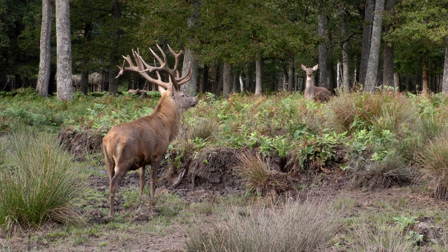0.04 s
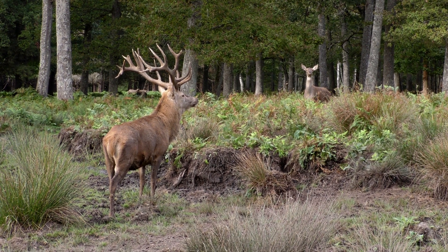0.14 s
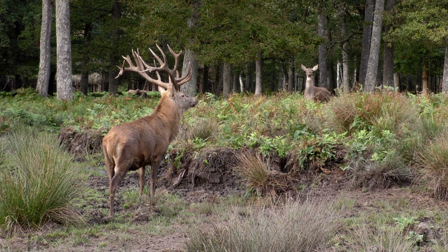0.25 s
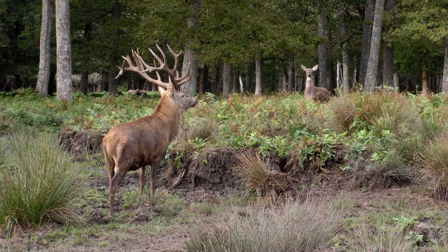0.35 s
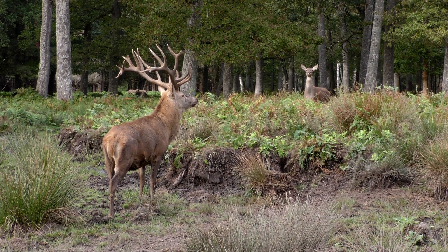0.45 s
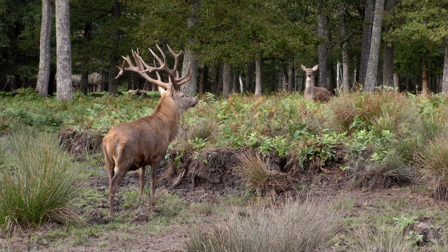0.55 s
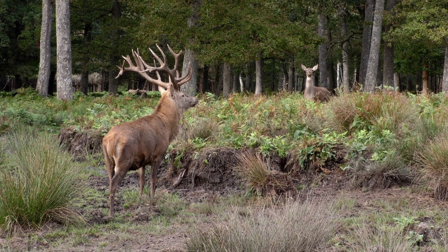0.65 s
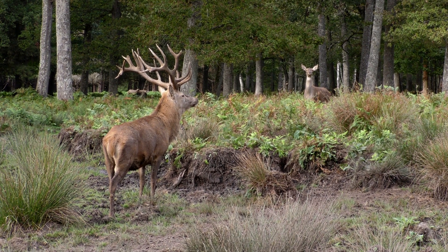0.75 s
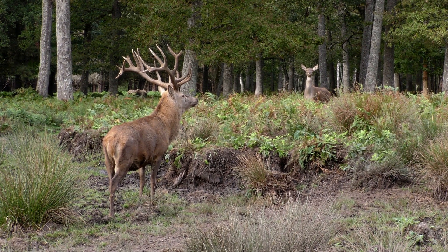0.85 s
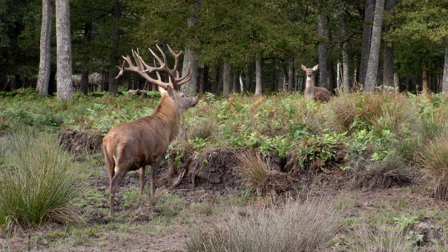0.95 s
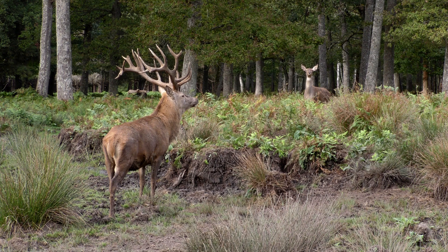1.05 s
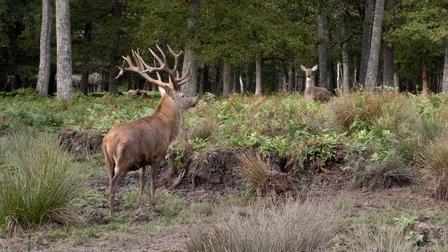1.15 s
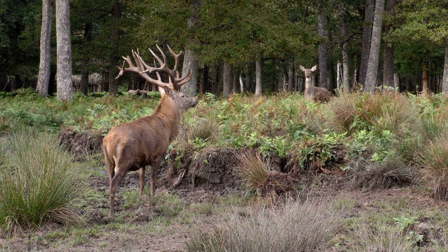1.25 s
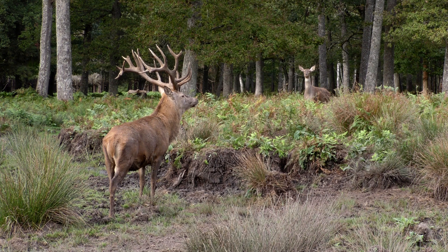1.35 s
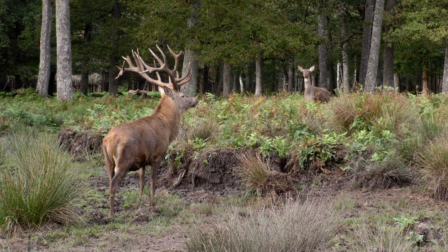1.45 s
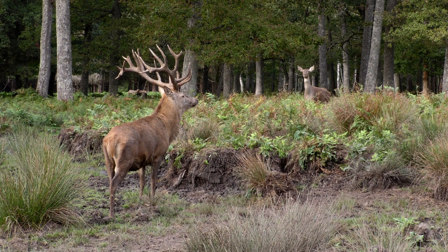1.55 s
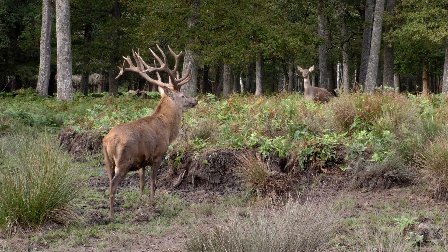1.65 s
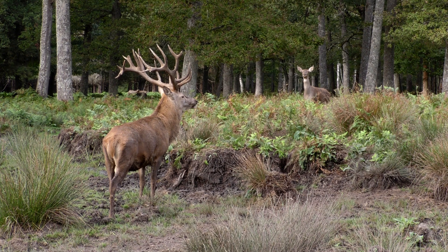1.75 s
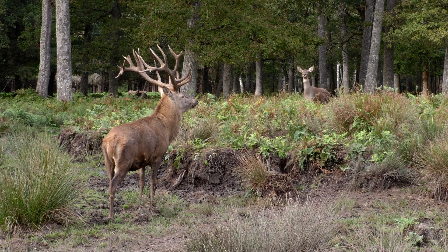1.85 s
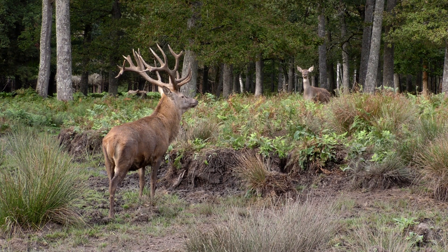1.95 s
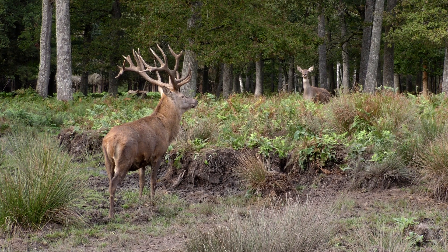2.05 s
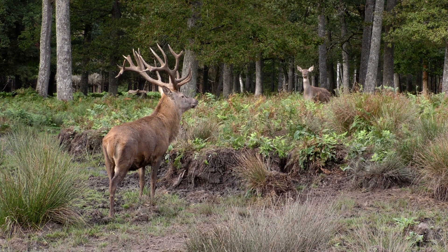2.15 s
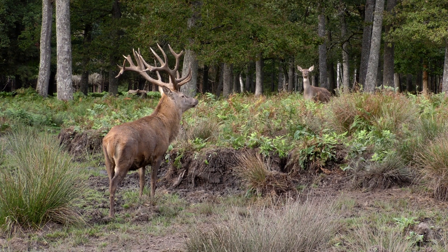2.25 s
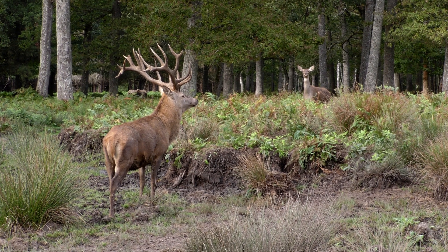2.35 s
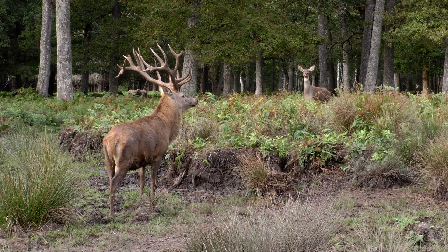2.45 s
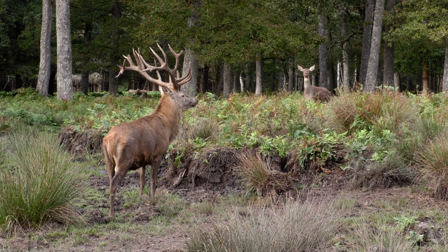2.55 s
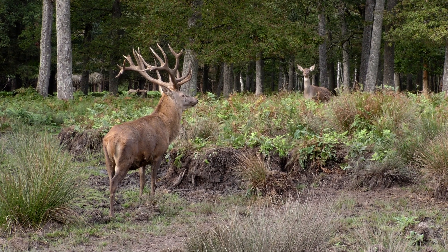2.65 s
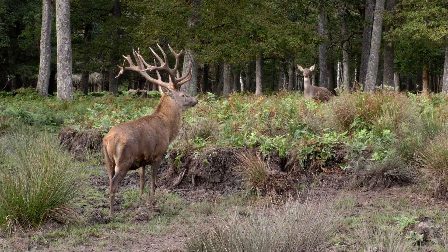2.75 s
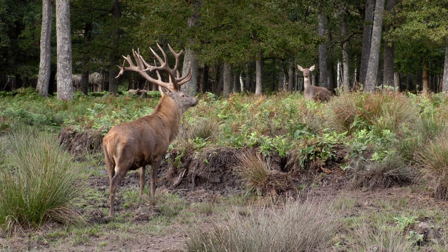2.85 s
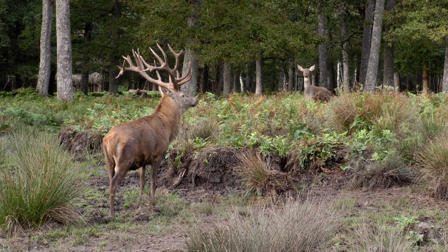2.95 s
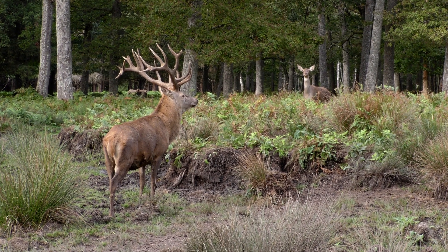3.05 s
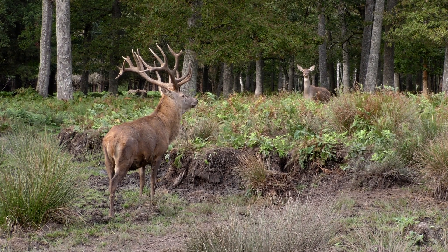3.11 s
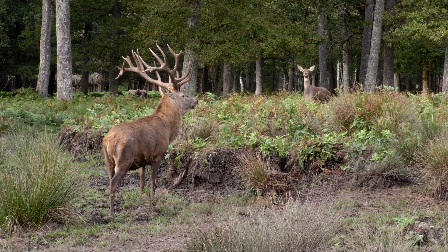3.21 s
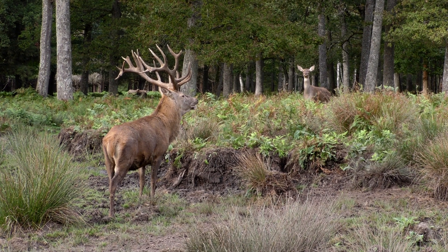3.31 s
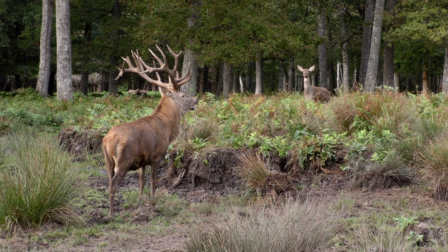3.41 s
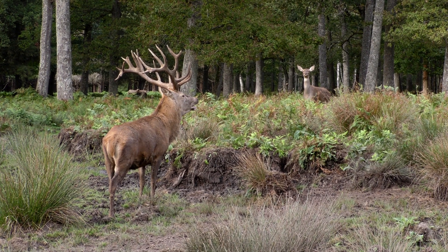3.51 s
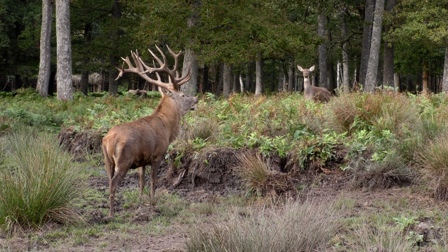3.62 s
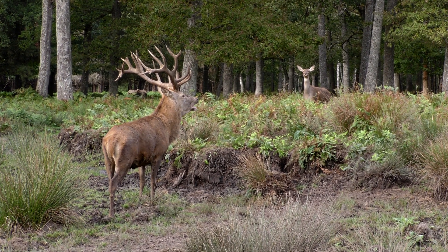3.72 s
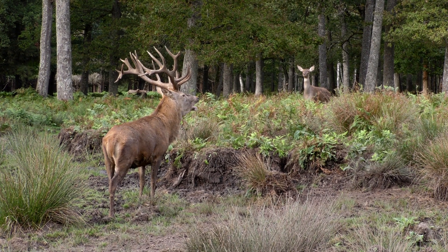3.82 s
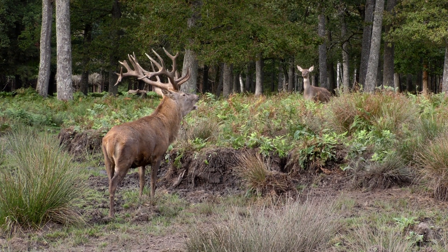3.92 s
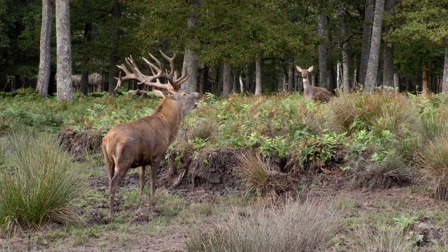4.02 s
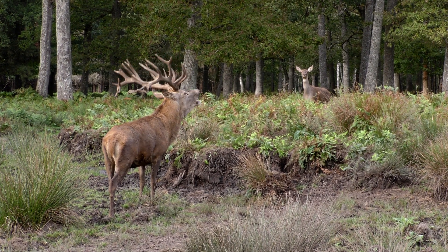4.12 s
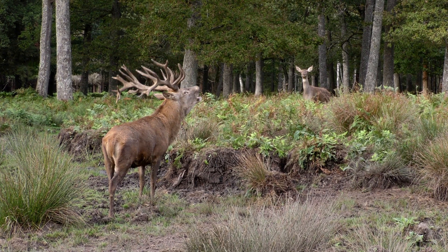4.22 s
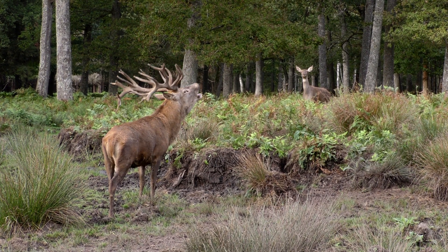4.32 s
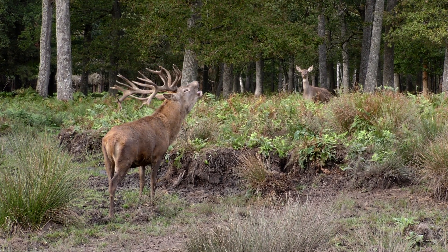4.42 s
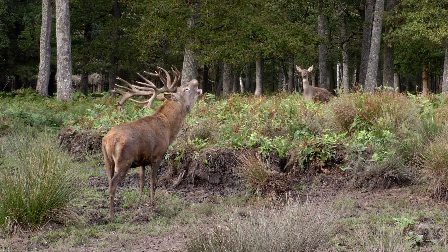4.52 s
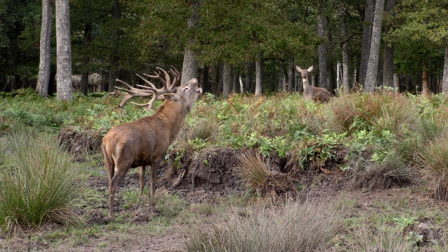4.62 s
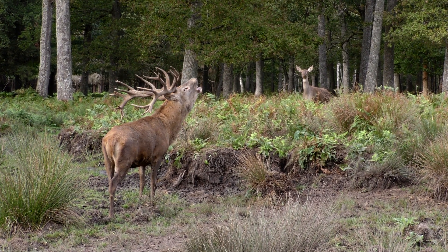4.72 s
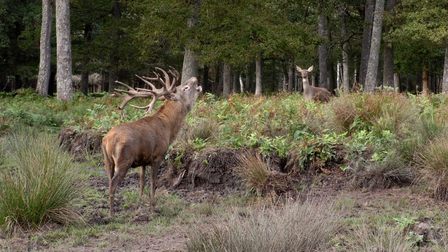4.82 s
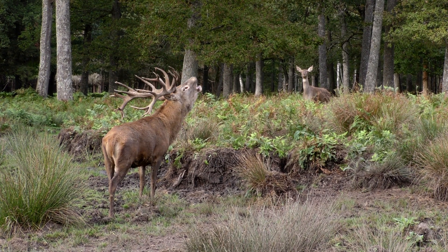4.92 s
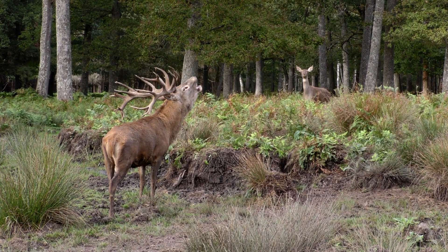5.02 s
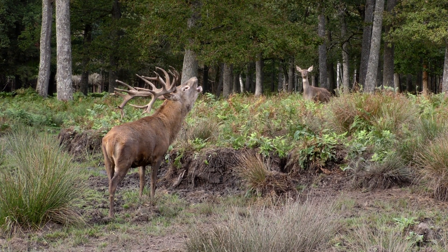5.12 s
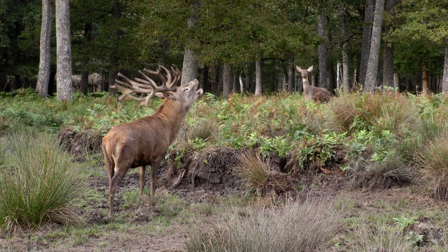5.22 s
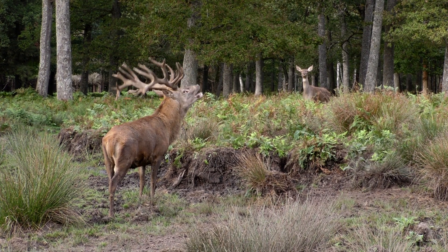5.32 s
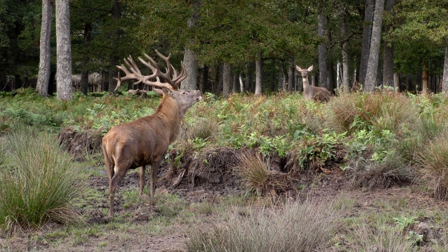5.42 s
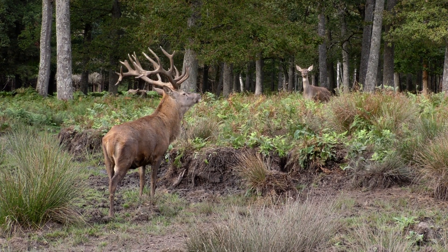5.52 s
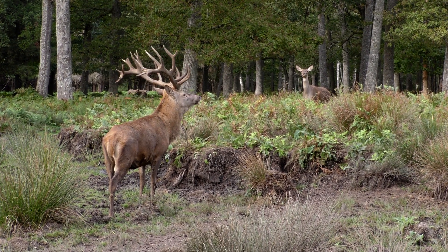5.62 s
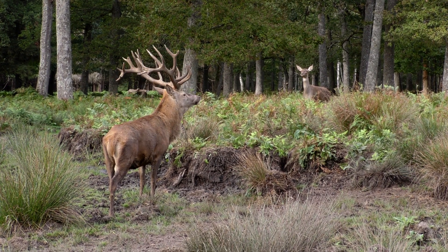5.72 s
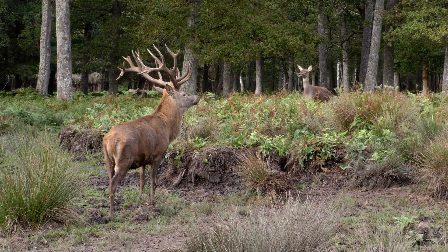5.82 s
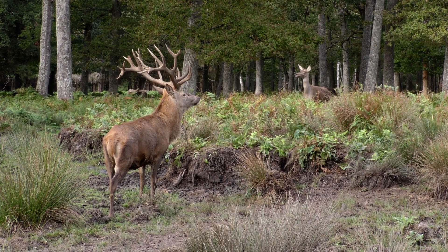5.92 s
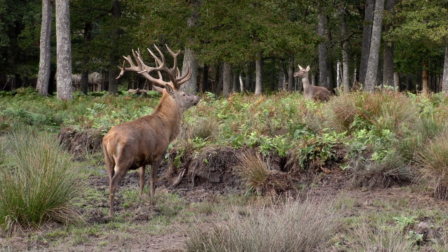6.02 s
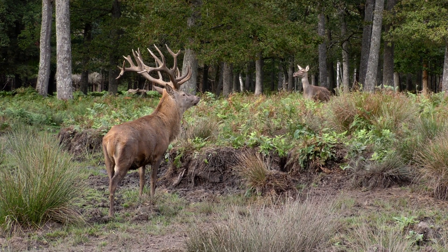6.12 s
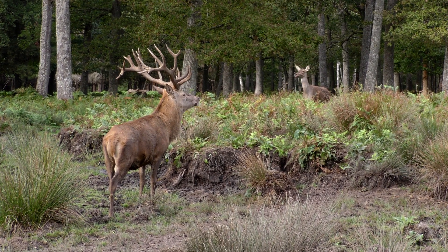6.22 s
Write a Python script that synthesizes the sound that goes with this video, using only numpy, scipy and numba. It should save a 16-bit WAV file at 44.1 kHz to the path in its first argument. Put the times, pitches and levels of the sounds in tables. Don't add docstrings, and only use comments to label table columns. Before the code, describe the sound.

A red deer stag gives one deep, swelling, throaty roar that echoes through open woodland, after distant hoarse crow calls and tiny bird ticks.

```python
import sys
import numpy as np
from scipy import signal
from scipy.fft import rfft, irfft
from scipy.io import wavfile
from scipy.ndimage import uniform_filter1d
from numba import njit

SR = 44100
rng = np.random.default_rng(int(sys.argv[2]) if len(sys.argv) > 2 else 0)


def natural_amplitude(level_db):
    exponent = np.asarray(level_db, float) / 20
    return 10 ** exponent


def master_out(mix):
    frames = np.transpose(np.atleast_2d(mix))
    ceiling = np.clip(frames, -1, 1)
    pcm = np.round(ceiling * 32767).astype(np.int16)
    wavfile.write(sys.argv[1], SR, pcm)


N = 276116
T = np.arange(N) / SR

GAPE_S, GAPE_RISE_S = 4.295, 0.05
SLACK_S = 5.22


def on_log(table, hz):
    f, v = np.transpose(table)
    return np.interp(np.log(np.maximum(hz, 1)), np.log(f), v)


def curves(rows):
    s, *columns = np.transpose(rows)
    return [np.interp(T, s, c) for c in columns]


def colour(x, table):
    gain_db = on_log(table, np.fft.rfftfreq(x.shape[-1], 1 / SR))
    return irfft(rfft(x) * natural_amplitude(gain_db), x.shape[-1])


def ramp(s, length):
    return np.clip((T - s) / max(length, 1e-3), 0, 1)


def bump(s, length):
    return np.exp(-((T - s) / length) ** 2)


def walk(rate):
    k = int(SR / rate)
    held = np.repeat(rng.standard_normal(N // k + 1), k)
    return 1.3 * uniform_filter1d(uniform_filter1d(held, k), k)[:N]


@njit
def svf(x, hz, width):
    y, b, l = np.empty(len(x)), 0., 0.
    for i in range(len(x)):
        g, k = np.tan(np.pi * hz[i] / SR), width[i] / hz[i]
        v = (b + g * (x[i] - l)) / (1 + g * (g + k))
        b, l, y[i] = 2 * v - b, l + 2 * g * v, k * v
    return y


def band(x, hz, width):
    hz, width = np.clip(hz + 0 * T, 15, .45 * SR), width + 0 * T
    return svf(svf(x + 1e-18, hz, width), hz, 2.12 * width)


def clicks(at, size):
    i, pulses = at.astype(int), np.zeros(N)
    np.add.at(pulses, i, size * (1 - at + i))
    np.add.at(pulses, i + 1, size * (at - i))
    return pulses


def air():
    # centre in Hz, level in dB per Hz.
    air_colour = [(20, 4.5), (40, -19), (70, -14.5), (120, -24.5), (190, -19.5), (290, -28.5), (400, -19.5),
                  (600, -18), (1000, -22), (1700, -24), (2500, -27.5), (5000, -33), (9000, -36.5),
                  (15600, -36.5)]
    # frequency in Hz, side minus mid in dB.
    air_width = [(60, -1.5), (110, -4.5), (200, -7), (380, -8.5), (700, -7), (1290, -3), (2380, 0.5),
                 (4400, 2.5), (8120, 4), (15000, 1)]
    # frequency in Hz, level in dB.
    hum_lines = [(382.2, -76), (613.7, -84)]
    out, swell = 0, walk(0.88)
    for hz in 22 * 2 ** np.arange(0, 9.6, .5):
        flicker_db = 1.0 + 1.2 * (hz < 500) + 2.7 * (hz < 100)
        gain = natural_amplitude(0.27 * swell + flicker_db * walk(6))
        pair = [svf(rng.standard_normal(N), hz + 0 * T, hz / 1.95 + 0 * T) for _ in range(2)]
        out = out + gain * np.array(pair)
    mid = colour(out[0], air_colour)
    side = colour(colour(out[1], air_colour), air_width)
    side += colour(mid, [(30, -5.5), (70, -7.0), (150, -46)])
    scale = natural_amplitude(-62.5) / np.sqrt(np.mean(mid ** 2))
    hum = 0
    for hz, db in hum_lines:
        phase = 2 * np.pi * np.cumsum(hz + 1.5 * walk(7.8)) / SR
        hum = hum + np.sqrt(2) * natural_amplitude(db + 1.3 * walk(4)) * np.sin(phase)
    return np.array([scale * mid + hum, scale * side])


def wood(x, far_db, near_db, near_t60, blur=0.82):
    # frequency in Hz, decay time (T60) in s.
    decay = [(150, 3.34), (500, 2.93), (1800, 3.88), (6000, 0.96)]
    # frequency in Hz, level in dB.
    trunk_colour = [(110, -21), (175, 4.5), (260, -13.5), (340, -0.5), (450, 2), (900, 0), (2200, 5.5),
                    (6000, 12)]
    # frequency in Hz, side minus mid in dB.
    spread = [(150, -40.5), (600, -20.5), (1500, -10.5), (4000, -11), (9000, -6.5)]
    t, tail = T[:3 * SR], 0
    for hz in 90 * 2 ** np.arange(0, 7.1):
        far = natural_amplitude(far_db - 60 * t / on_log(decay, hz)) * np.clip(t / 0.047, 0, 1)
        near = natural_amplitude(near_db + 10 - 60 * t / near_t60) * (t > .004)
        octave = signal.butter(2, [hz / np.sqrt(2), hz * np.sqrt(2)], "band", fs=SR, output="sos")
        noise = signal.sosfilt(octave, rng.standard_normal((2, len(t))))
        tail = tail + noise * (far + near) / np.sqrt(.2 * SR)
    blurred = colour(x * (1.3 - blur + blur * walk(130)), trunk_colour)
    mid, side = signal.fftconvolve(blurred[None], tail, axes=1)[:, :N]
    return np.array([mid, colour(side, spread)])


def cricket():
    # start in seconds, length in seconds, level in dB.
    buzzes = [
        (5.67, 0.018, -66.5),
        (5.699, 0.012, -66.5),
        (5.729, 0.013, -69),
    ]
    teeth = np.exp(-((T * 330) % 1) / 0.47) * rng.standard_normal(N)
    wing = band(teeth, 8700, 2200)
    gate = sum(natural_amplitude(db) * (T > s) * (T < s + length) for s, length, db in buzzes)
    return wing / np.sqrt(np.mean(wing ** 2)) * gate


def bird():
    # start in seconds, first pitch in Hz, last pitch in Hz, length in seconds, level in dB.
    flicks = [
        (.58, 6200, 8240, 0.016, -58),
        (1.701, 5000, 7900, 0.0071, -53),
        (2.8864, 5000, 8050, .0055, -50.5),
    ]
    out = np.zeros(N)
    for s, from_hz, to_hz, length, db in flicks:
        u = np.clip((T - s) / length, 0, 1)
        phase = 2 * np.pi * np.cumsum(to_hz + (from_hz - to_hz) * (1 - u) ** 1.2) / SR
        swell = np.sqrt(np.sin(np.pi * u) + 1e-12) * (u > 0) * (u < 1)
        out += natural_amplitude(db) * np.sin(phase) * swell
    return out


def crow():
    # start in seconds, length in seconds, first pitch in Hz, last pitch in Hz, level in dB.
    calls = [
        (-.03, 0.29, 378.3, 326.7, -68.5),
        (0.803, .3, 376.8, 326.2, -67.5),
        (1.611, 0.29, 380.8, 330, -67.5),
        (2.489, 0.33, 375.3, 323.6, -69),
    ]
    # multiple of the pitch, level in dB.
    harmonics = [(2, -2), (3, 1.5), (4, -20.5), (5, -1), (6, -3.5), (7, -6.5)]
    beak_hz, beak_width_hz, beak_db = 1590, 174, 7
    out = np.zeros(N)
    for s, length, from_hz, to_hz, db in calls:
        u = np.clip((T - s) / length, 0, 1)
        hz = from_hz + (to_hz - from_hz) * u
        phase = 2 * np.pi * np.cumsum(hz * (1 + .012 * walk(90))) / SR
        call = 0
        for k, g in harmonics:
            beak = beak_db * np.exp(-((k * hz - beak_hz) / beak_width_hz) ** 2)
            fade_db = 4.7 * (k < 3.5) * (.5 - u)
            call = call + natural_amplitude(g + beak + 3.2 * walk(40.22) + fade_db) * np.sin(k * phase)
        out += natural_amplitude(db) * call * np.clip(u / 0.1, 0, 1) * (1 - u) ** 0.25
    return out


def unevenness():
    # start in seconds, length in seconds, then from 0 to 1 the roughness,
    # the every-second-pulse pattern and the every-third-pulse pattern.
    spells = [
        (3.5, .14, .2, 0, 0),
        (4.1, .09, .27, .15, 0),
        (4.31, .33, .1, 0, 0),
        (4.43, .07, 0, 0, .4),
        (4.52, .12, 0, .3, 0),
        (4.84, .13, .03, 0, .27),
        (4.95, .05, .14, 0, 0),
        (5.215, .2, .5, 0, 0),
    ]
    edge_s = .05
    total = 0
    for s, length, *row in spells:
        gate = ramp(s - edge_s / 2, edge_s) - ramp(s + length - edge_s / 2, edge_s)
        total = total + np.outer(row, gate)
    rough, second, third = total
    return .03 + rough, second, third


def folds(hz):
    rough, second, third = unevenness()
    phase = np.cumsum(hz) / SR
    k = np.arange(1, int(phase[-1]) - 1)
    chance = np.clip(rng.standard_normal((2000, 2))[:len(k)].T, -2, 2)
    at = np.interp(k, phase, np.arange(N))
    i = at.astype(int)
    pattern = second[i] * (-1.) ** k + third[i] * np.cos(2 * np.pi * k / 3)
    size = (1 + pattern) * natural_amplitude(9 * rough[i] * chance[0])
    slip = (.12 * pattern + .14 * rough[i] * chance[1]) * SR / hz[i]
    breath = rng.standard_normal(N) * (0.61 + np.exp(-(phase % 1) / 1.4))
    share = np.clip(rough[i] * 2, .15, 1)
    steady = clicks(np.clip(at + share * slip, 0, N - 2), 1 + share * (size - 1))
    uneven = clicks(np.clip(at + slip, 0, N - 2), size) + (0.0014 + 0.046 * rough) * breath
    return steady, uneven, breath


def roar_pitch():
    # time in seconds, pitch in Hz.
    glide = [(3.59, 85), (3.75, 118.5), (3.9, 132.1), (4.094, 139.4), (4.18, 158.7), (4.34, 176.1),
             (4.9, 173.8), (5.205, 156.3), (5.351, 80.16)]
    held_s, held_length_s, held_hz = 4.2, 0.1102, 4.94
    hz, = curves(glide)
    held = ramp(held_s, held_length_s) - ramp(held_s + held_length_s, 0.016)
    return uniform_filter1d(hz, int(0.041 * SR)) - held_hz * held


def throat():
    # time in seconds, larynx drop from 0 to 1.
    larynx = [(3.6, 0.05), (3.8, .08), (3.96, 0.48), (4.1, 0.83), (4.24, 0.98), (4.9, 1.01), (5.35, 1.05)]
    # Hz with the larynx up, Hz with it down, last step at the gape in Hz.
    reach = [(275, 330.8, 3), (1108, 500, -9), (1613, 942.4, -135), (2107, 1310, -120), (2734, 1450, -27)]
    drop, = curves(larynx)
    gape_step = ramp(GAPE_S - .045, GAPE_RISE_S + .02)
    centres = [up_hz + (down_hz - up_hz) * drop + step_hz * gape_step for up_hz, down_hz, step_hz in reach]
    gulp_hz = 120 * bump(4.09, 0.087)
    slack_hz = 1300 * np.maximum(T - SLACK_S, 0)
    centres[0] = np.maximum(centres[0] + gulp_hz - slack_hz, 200)
    loose_up, loose_down = 2.7, 1.052
    loose = loose_down + (loose_up - loose_down) * bump(3.79, 0.18)
    return centres, loose


def gape():
    # dB before the gape, dB wide open, dB after, opens early by seconds.
    shares = [
        (-3.5, 5.5, -3.5, 0),
        (-3.5, 4, -10, 0.34),
        (-4.5, 8.5, -5.5, 0),
        (-2, 3.5, -6, 0),
    ]
    shut = ramp(4.82, 0.16)
    layers = []
    for before_db, open_db, after_db, early in shares:
        opening = ramp(GAPE_S - early, GAPE_RISE_S + early / 2)
        layers.append(before_db + (open_db - before_db) * opening + (after_db - open_db) * shut)
    chest_db, throat_db, mouth_db, rasp_db = layers
    slack_db = 61.5 * np.clip(T - SLACK_S, 0, .15)
    chest_db = chest_db + slack_db - 6 * bump(4.2, 0.081)
    return chest_db, throat_db + 1.5 * slack_db, mouth_db, rasp_db


def throat_rings(steady, uneven, centres, loose):
    # width in Hz, level in dB.
    ring_shapes = [(85, 2.5), (44.7, 7), (82, 6), (51.5, -1.5), (53, 1.5)]
    drive = [steady, uneven, uneven, uneven, steady]
    rings = []
    for k, (w, g) in enumerate(ring_shapes):
        rings.append((-1) ** k * natural_amplitude(g) * band(drive[k], centres[k], w * loose))
    return rings


def mouth_and_nose(steady, stretch, loose):
    # centre in Hz, width in Hz, level in dB.
    cavities = [(1879, 170, -6.5), (2144, 36, -6), (2482, 100, -25.5), (2743, 39, -14), (3083, 100, -18)]
    out = 0
    for k, (f, w, g) in enumerate(cavities):
        gain = (-1) ** k * natural_amplitude(g + 4.2 * walk(9)) * loose ** (k / 2 - 1.5)
        out = out + gain * band(steady, f * stretch, w * loose)
    return out


def breathy_top(steady, uneven, breath, stretch, loose):
    # centre in Hz, width in Hz, level in dB.
    airy = [(3614, 420, -1.5), (4240, 130, -10), (4615, 180, -8), (5240, 300, -24), (5990, 370, -12),
            (6910, 230, -19.5), (7700, 340, -21), (8600, 400, -31.5), (9600, 450, -26.5)]
    # time in seconds, length in seconds, centre in Hz, width in Hz, level in dB.
    flares = [
        (3.877, .1, 1250, 350, -7.5),
        (3.918, 0.096, 3880, 600, -26),
        (3.995, 0.054, 2570, 493, -9),
        (4.096, .04, 3190, 499.6, -15.5),
        (4.246, 0.049, 2270, 297, -4),
        (4.27, 0.054, 5300, 502, -28.5),
        (4.383, 0.021, 3250, 502, -14),
        (5.119, 0.031, 2950, 349, -8),
    ]
    hiss = .4 * loose ** 2 * uneven + .1 * breath / loose ** 2
    out = 0
    for k, (f, w, g) in enumerate(airy):
        gain = (-1) ** k * natural_amplitude(-30.5 + g + 2.7 * walk(14))
        out = out + gain * band(hiss, f * stretch, w * loose)
    for s, length, f, w, g in flares:
        out += natural_amplitude(g) * bump(s, length) * band(steady, f, w)
    return out


def stag():
    # time in seconds, level in dB.
    effort = [(3.59, -72), (3.615, -58), (3.7, -43), (3.9, -33), (4.18, -24.5), (4.45, -21.5),
              (4.95, -24.5), (5.2, -22.5), (5.34, -37)]
    # time in seconds, length in seconds, change in dB.
    surges = [
        (3.974, 0.013, 2.5),
        (4.247, 0.052, 7),
        (5.23, 0.019, -3),
        (5.271, 0.0055, 5.5),
        (5.273, 0.013, -5),
    ]
    # centre in Hz, width in
    # Hz, level in dB.
    fixed_ringing = [(555, 530, -11), (706, 38.5, -6), (952, 100, -8.5)]
    # time in seconds, centre in Hz, depth from 0 to 1.
    nose = [(4.2, 1700, 0), (4.4, 1620, .9), (4.95, 1600, .9), (5.1, 1680, .9), (5.36, 1680, .7)]
    start_s, end_s = effort[0][0], effort[-1][0]
    db, = curves(effort)
    db = db + sum(heave_db * bump(s, length) for s, length, heave_db in surges)
    hz = roar_pitch()
    chest_db, throat_db, mouth_db, rasp_db = gape()
    asleep_db = -16 * (1 - ramp(start_s, .17))
    rasp_db = rasp_db + asleep_db
    centres, loose = throat()
    steady, uneven, breath = folds(hz)
    rings = throat_rings(steady, uneven, centres, loose)
    stretch = (centres[-1] / 1420) ** .15
    upper = mouth_and_nose(steady, stretch, loose)
    top = breathy_top(steady, uneven, breath, stretch, loose)
    voice = natural_amplitude(mouth_db) * (natural_amplitude(-8) * band(steady, hz, 40) + natural_amplitude(asleep_db) * rings[4])
    voice += natural_amplitude(chest_db) * rings[0] + rings[1]
    voice += natural_amplitude(throat_db) * rings[2] + natural_amplitude(asleep_db) * rings[3]
    voice += loose * sum(natural_amplitude(g) * band(steady, f, w) for f, w, g in fixed_ringing)
    voice -= natural_amplitude(rasp_db) * upper
    nose_hz, depth = curves(nose)
    voice -= depth * svf(voice, nose_hz, 130 + 0 * T)
    voice += natural_amplitude(-2.0) * band(uneven - steady, 235, 55)
    voice = colour(voice, [(80, -20), (125, 0), (3300, 0), (4200, -14), (8000, -30)])
    voice += natural_amplitude(rasp_db) * colour(top, [(9500, -2), (11000, -28.5)])
    voice /= np.sqrt(uniform_filter1d(voice ** 2, size=3000) + 1e-12)
    gate = np.clip((T - start_s) / 0.016, 0, 1) * np.clip((end_s - T) / 0.035, 0, 1)
    return voice * natural_amplitude(db) * gate


def scene():
    roar, far, small = stag(), crow(), bird()
    lean = -colour(roar, [(600, -31.5), (1500, -20), (3000, -19.5), (8000, -14.0)])
    to_trunks = roar - 0.35 * svf(roar, 1396 + 0 * T, 160 + 0 * T)
    mix = wood(to_trunks, far_db=-17, near_db=-20, near_t60=0.61)
    mix = mix + wood(far, far_db=-7.5, near_db=-14, near_t60=0.71, blur=0.67)
    mix = mix + wood(small, far_db=-39.0, near_db=-16, near_t60=.2, blur=0)
    mid, side = mix + air()
    mid += roar + small + cricket() + .6 * far
    side += lean + 0.22 * small
    return np.array([mid + side, mid - side])


def top_cut(x):
    return signal.sosfilt(signal.butter(12, 15680, fs=SR, output="sos"), x)


def record(dry):
    rounded = np.tanh(1.6 * dry) / 1.6
    low_pass = signal.ellip(10, .2, 70, 15690, fs=SR, output="sos")
    return top_cut(signal.sosfilt(low_pass, rounded))


dry = scene()
out = record(dry)
master_out(out)
```